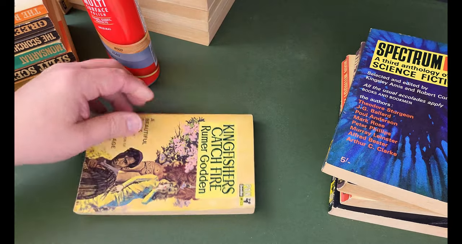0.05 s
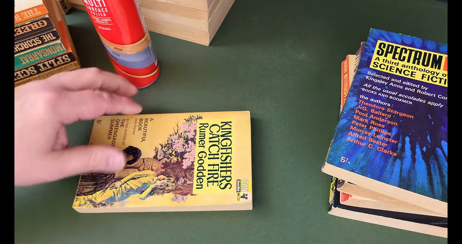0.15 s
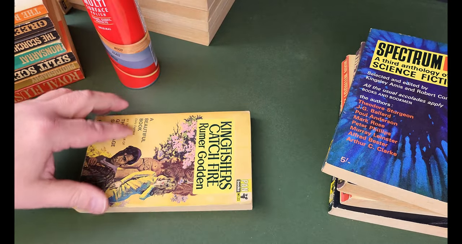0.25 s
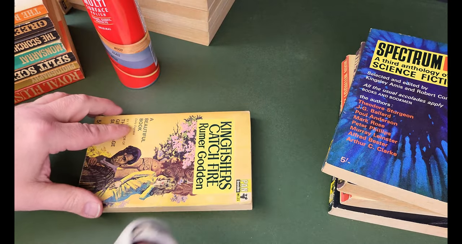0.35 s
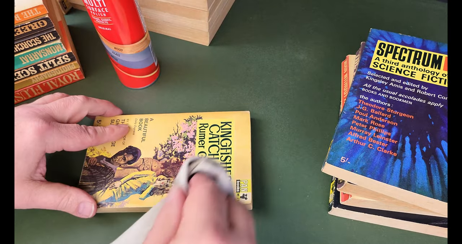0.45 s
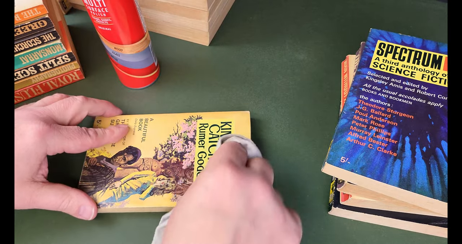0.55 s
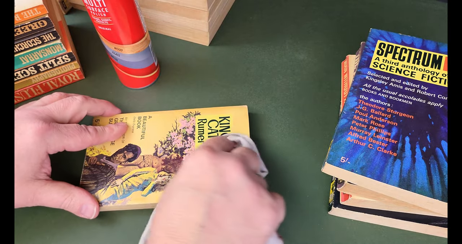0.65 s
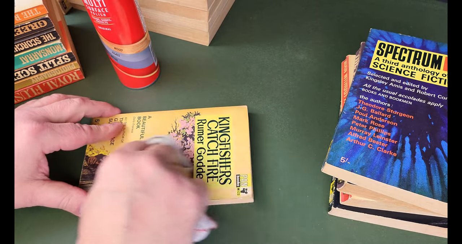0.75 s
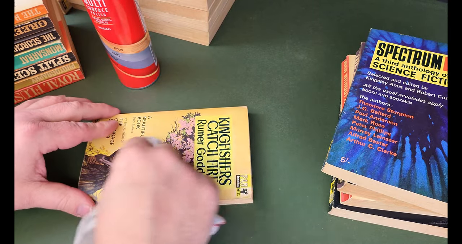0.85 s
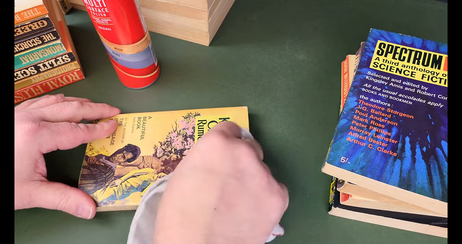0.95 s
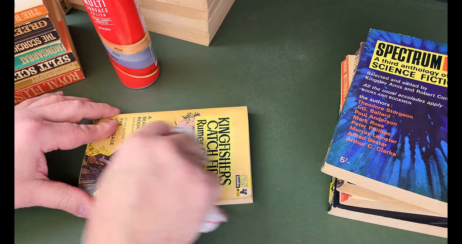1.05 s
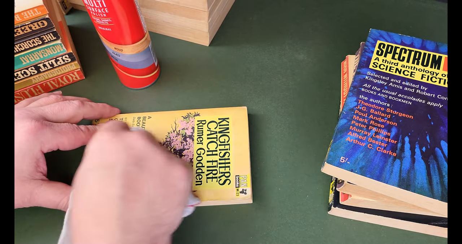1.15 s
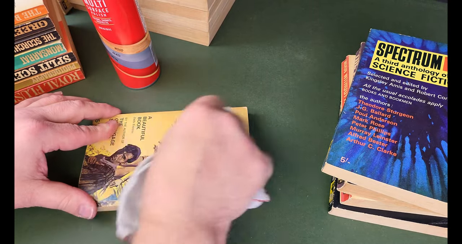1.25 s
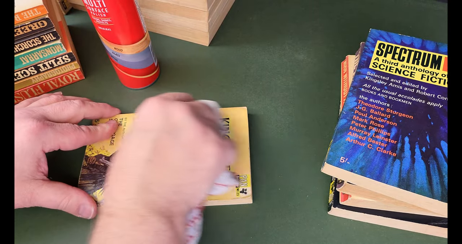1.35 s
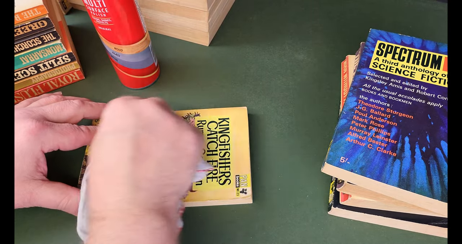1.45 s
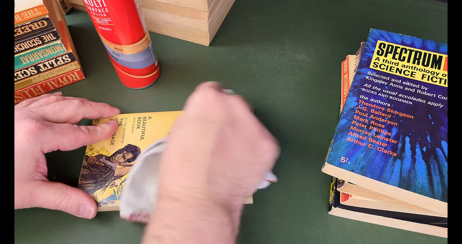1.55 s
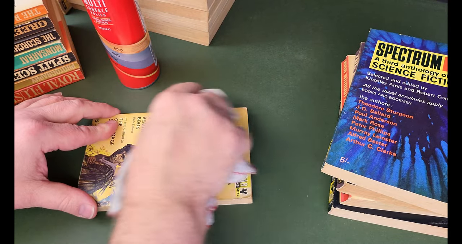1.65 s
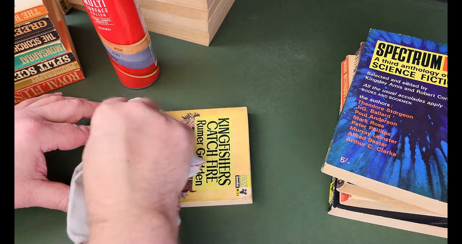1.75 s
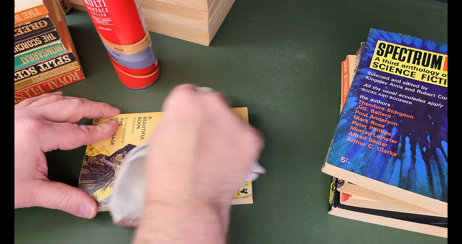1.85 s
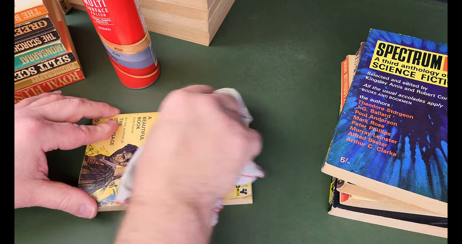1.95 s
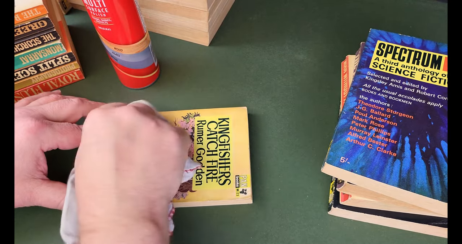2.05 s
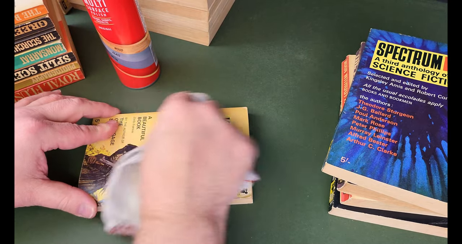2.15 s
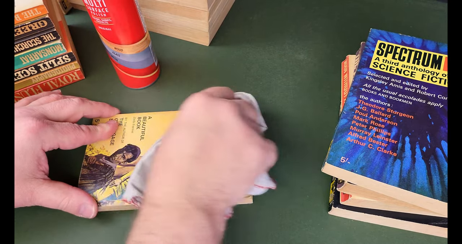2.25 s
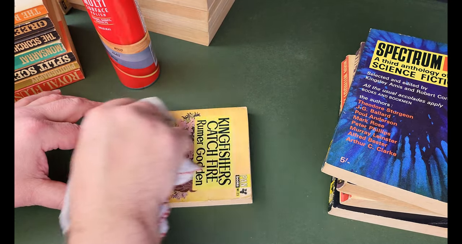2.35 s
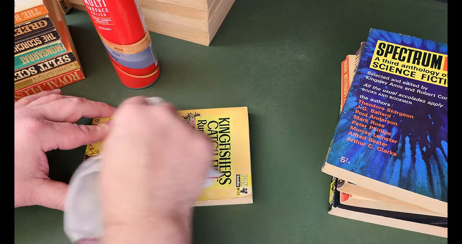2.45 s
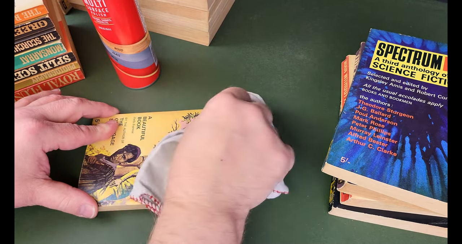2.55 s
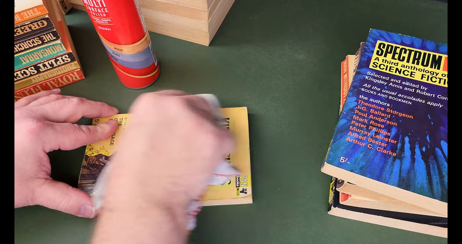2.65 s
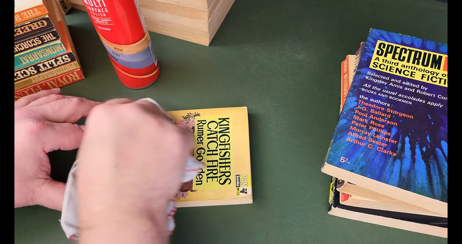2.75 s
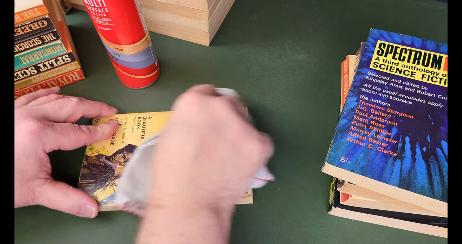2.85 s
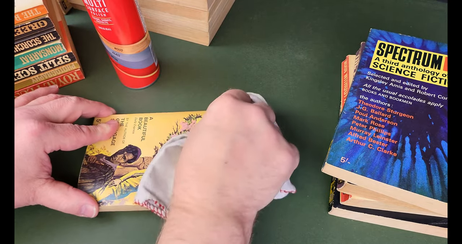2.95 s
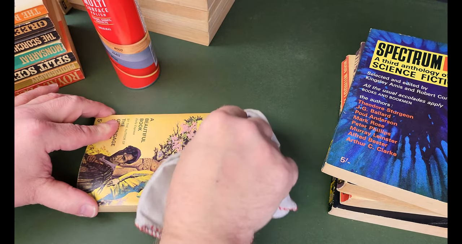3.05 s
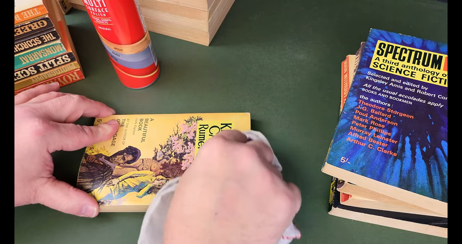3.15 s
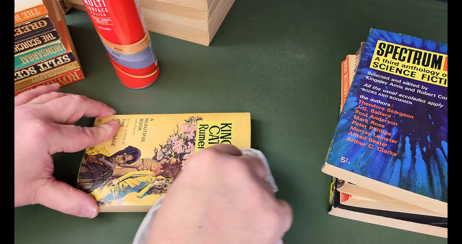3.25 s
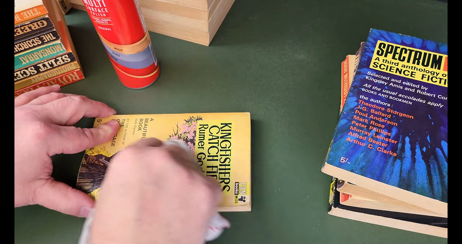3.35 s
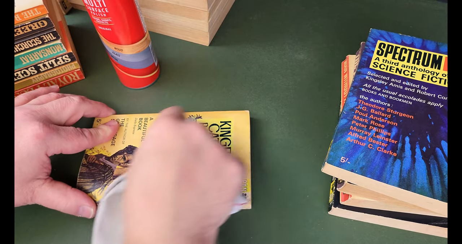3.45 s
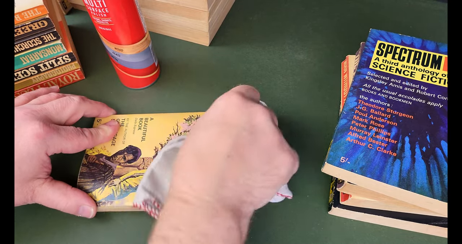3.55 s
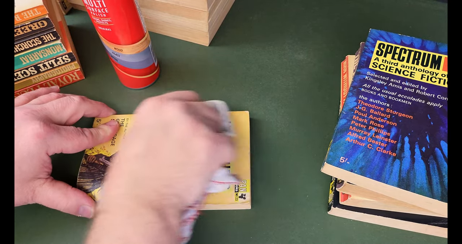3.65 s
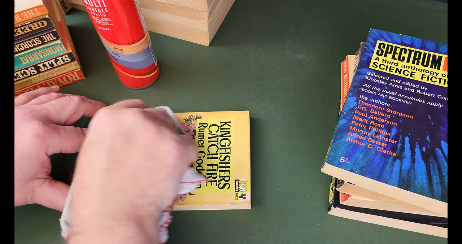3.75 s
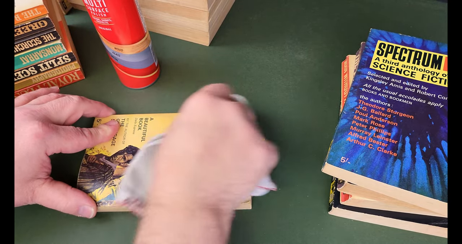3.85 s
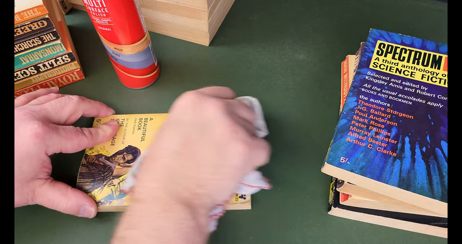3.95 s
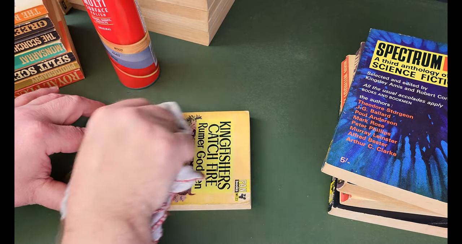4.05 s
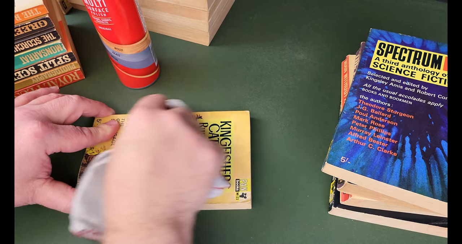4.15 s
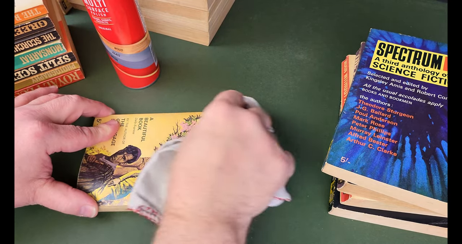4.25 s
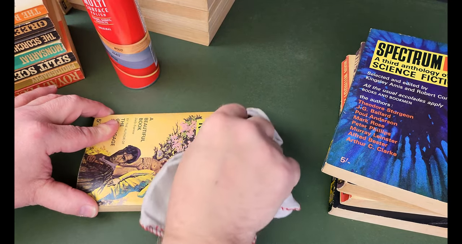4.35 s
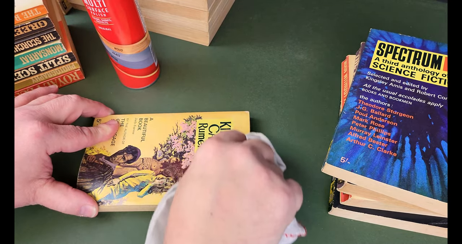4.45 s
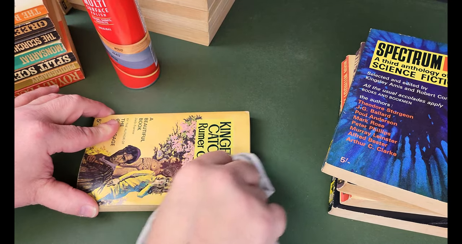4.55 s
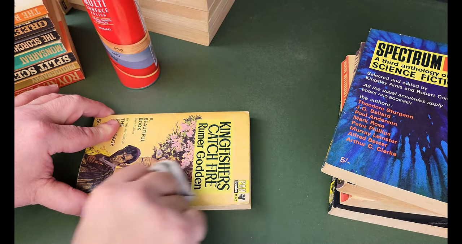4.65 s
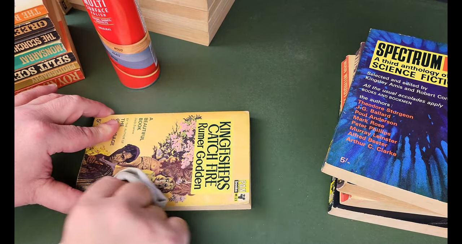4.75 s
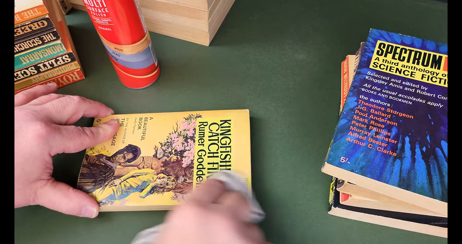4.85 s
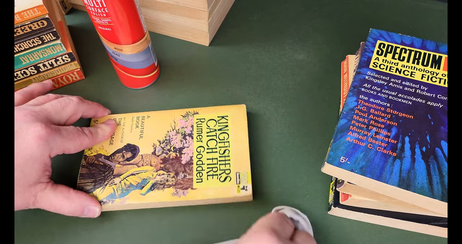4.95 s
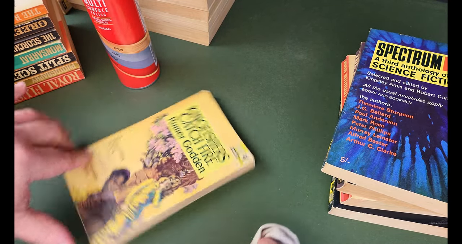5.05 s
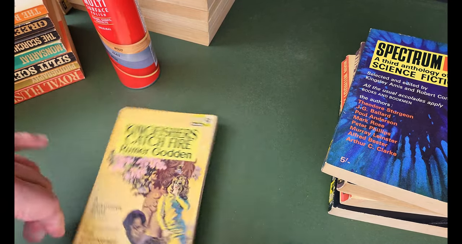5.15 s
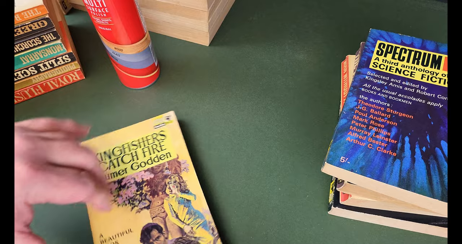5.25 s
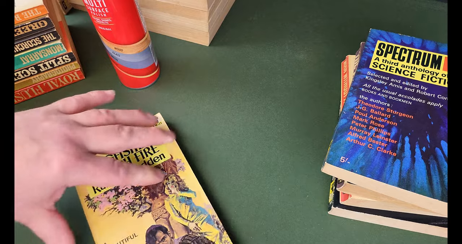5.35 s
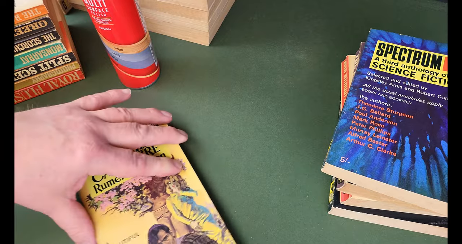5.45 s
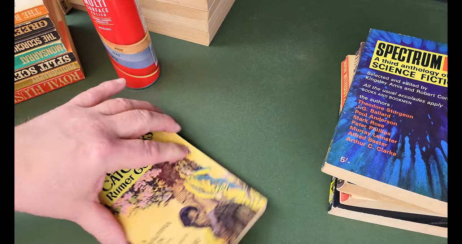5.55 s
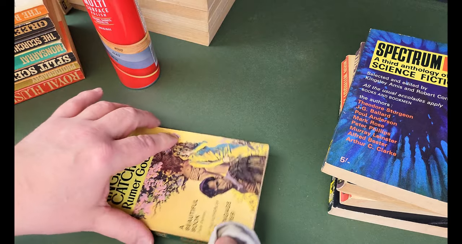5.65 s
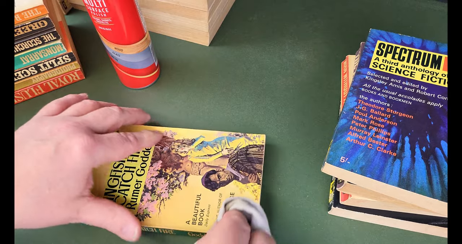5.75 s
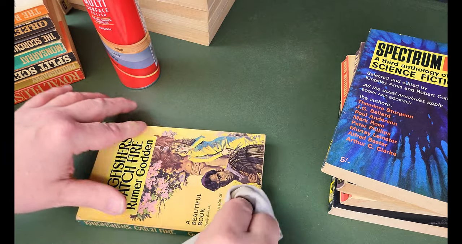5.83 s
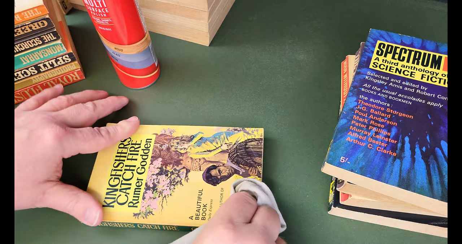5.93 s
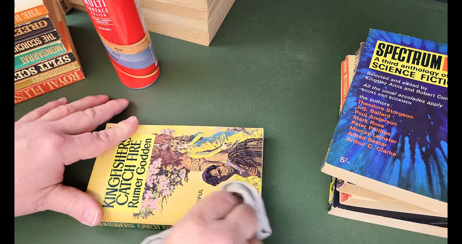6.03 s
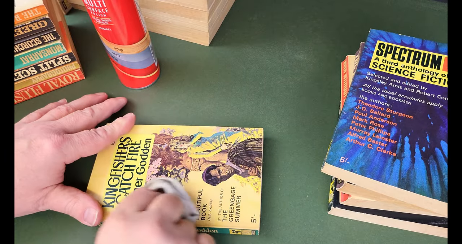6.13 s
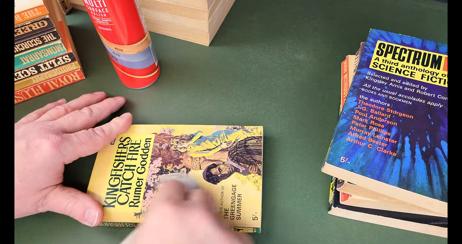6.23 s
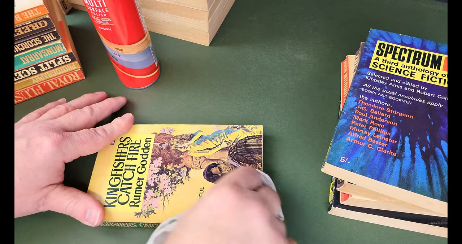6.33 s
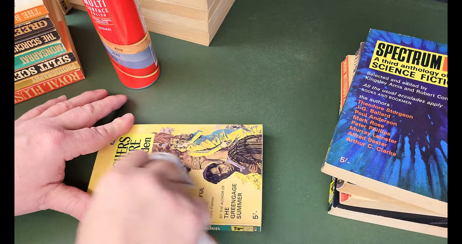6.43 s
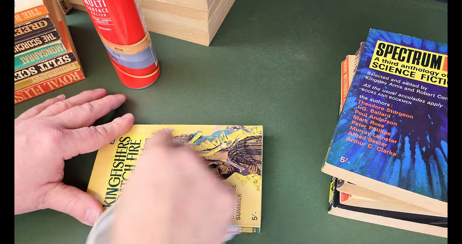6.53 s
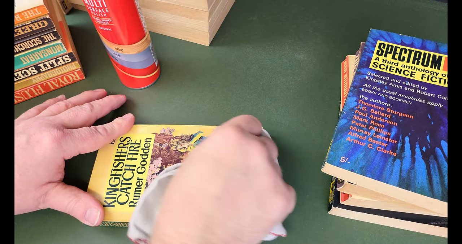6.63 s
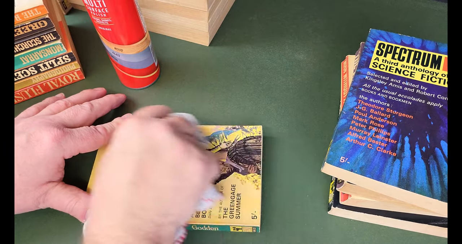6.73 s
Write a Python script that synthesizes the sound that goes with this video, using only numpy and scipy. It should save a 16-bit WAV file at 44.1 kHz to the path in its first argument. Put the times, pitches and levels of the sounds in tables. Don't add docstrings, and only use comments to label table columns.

```python
import sys
import numpy as np
from scipy import signal
from scipy.fft import rfft, irfft, next_fast_len
from scipy.io import wavfile
from scipy.ndimage import uniform_filter1d

SR = 44100
rng = np.random.default_rng(int(sys.argv[2]) if len(sys.argv) > 2 else 0)


def output_pcm(signal):
    pcm = np.clip(np.atleast_2d(signal).T, -1, 1) * 32767
    wavfile.write(sys.argv[1], SR, np.round(pcm).astype(np.int16))


def ratio(d):
    e = np.asarray(d, float) / 20
    return 10 ** e


N = 299439
T, M = np.arange(N) / SR, next_fast_len(N)
F = np.maximum(np.arange(M // 2 + 1) * SR / M, 1)
C = np.linspace(0, N / SR, N // (2 * 20))
SLAP_S = .1582


def unit(x):
    return x / np.sqrt(np.mean(x ** 2))


def shape(table, hz):
    table_hz, db = np.transpose(table)
    return np.interp(np.log(hz), np.log(table_hz), db)


def walk(rate):
    hold = int(1 / C[1] / rate)
    steps = np.repeat(rng.standard_normal(len(C) // hold + 1), hold)[:len(C)]
    return 1.2 * uniform_filter1d(uniform_filter1d(steps, hold), hold)


def ring(x, hz, t60):
    pole = np.exp(2j * np.pi * hz / SR - np.log(1000) / (t60 * SR))
    return signal.lfilter([0, pole.imag], [1, -2 * pole.real, abs(pole) ** 2], x)


def catches(rate, spread_db):
    size = ratio(spread_db * rng.standard_normal(M)) * np.sign(rng.standard_normal(M))
    return unit(size * (rng.random(M) < rate / SR))


def add(out, s, x):
    i = int(s * SR)
    out[i:i + len(x)] += x[:len(out) - i]


# f/Hz, density/dB per Hz
ROOM_COLOUR = [(18, -35), (30, -10), (85, -1), (243, -1), (443, -10.5), (673, -11), (945, -19.5),
               (3490, -24.5), (4090, -23), (7500, -27), (15500, -30)]


def room():
    level_db, duck_db, duck_back_s = -66.5, -5, .5
    duck = duck_db * (T > SLAP_S) * np.exp(-(abs(T - SLAP_S) / duck_back_s) ** 2)
    hiss = irfft(rfft(rng.standard_normal(M)) * ratio(shape(ROOM_COLOUR, F)), M)[:N]
    return ratio(level_db + duck) * unit(hiss)


# f/Hz, level/dB, t60/s
TABLE_MODES = [(66, -22, 0.28), (86, -4, 0.24), (128, -5, 0.32), (191, -4, 0.16), (237, 4, 0.13),
               (270.5, -1, 0.1417), (372, -1.5, 0.11), (410.7, 2, 0.077), (485, 1.5, 0.044),
               (522, -4.5, 0.031), (708, -10, 0.07), (930, -6, 0.02), (1120, -15, 0.03),
               (1403, -22.5, 0.074)]


def table_parts(push, scatter_db, damp):
    parts = np.zeros((3, len(push)))
    for hz, db, t60 in TABLE_MODES:
        gain = ratio(db + scatter_db * rng.standard_normal())
        swing = gain * ring(ring(push, hz, 6.7 / hz), hz, damp * t60)
        parts[int(hz > 170) + int(hz > 420)] += swing * hz
    return parts


# t/s, level/dB
PRESSURE = [(0.0, -59), (0.26, -60), (0.6, -73), (0.9, -67), (1.6, -65.5), (1.9, -59), (2.42, -63.5),
            (2.62, -54), (3.0, -60), (3.3, -67.5), (4.3, -63), (4.6, -66.5), (5.06, -56), (5.3, -63),
            (5.93, -84), (5.99, -64), (6.3, -51), (6.5, -61), (6.79, -66.5)]
# t/s, deep peak level/dB, spread/s
HAND_LEANS = [(.14, -50, 0.1), (.26, -47.5, 0.052), (0.72, -51.5, 0.052), (.91, -59.5, 0.068),
              (1.11, -56, 0.028), (1.24, -51, 0.053), (1.608, -53, 0.018), (1.899, -55, 0.17),
              (2.21, -54.5, 0.057), (2.33, -52, 0.025), (2.559, -49, 0.081), (2.72, -48, 0.069),
              (2.87, -49.5, 0.13), (3.02, -56, .05), (3.57, -54.5, 0.066), (3.88, -55.5, 0.067),
              (4.21, -50.5, 0.055), (4.41, -51.5, 0.062), (4.76, -64, 0.02), (5.01, -54, 0.027),
              (5.499, -61.5, 0.052), (5.985, -46, .018), (6.05, -57, 0.052), (6.23, -52, 0.05),
              (6.35, -45, 0.032), (6.43, -54, 0.034), (6.61, -53, 0.035)]


def rumble():
    rest_db, deep_rest_db, deep_slope, book_rest_db, book_slope = -65, -70, .3, -70, 0.68
    lean_rise_db, lean_fall_db = 14, 11
    press_db = np.interp(C, *np.transpose(PRESSURE))
    deep = ratio(2 * (deep_rest_db + deep_slope * (press_db - rest_db)))
    for s, db, spread_s in HAND_LEANS:
        u = (C - s) / spread_s
        deep = deep + ratio(2 * (db + np.minimum(lean_rise_db * u, -lean_fall_db * u)))
    lump = (deep / uniform_filter1d(deep, size=330)) ** 0.26
    board = lump * ratio(press_db)
    book = lump * ratio(book_rest_db + book_slope * (press_db - rest_db))
    out = np.zeros(N)
    for part, gain in zip(table_parts(catches(260, 2.6)[:N], 0, 0.67), (np.sqrt(deep), board, book)):
        loudness = uniform_filter1d(unit(part) ** 2 + .05, size=2400)
        out += unit(part / loudness ** 0.31) * np.interp(T, C, gain) * ratio(0.34)
    return out


# t/s, board peak level/dB, deep level/dB and book level/dB re board
HARD_TAPS = [(0.049, -43, -18, 6), (0.883, -48, -8, 1.5), (1.264, -39.5, -2, -9.5), (3.044, -38, -19, 0.5),
             (4.184, -62, -5, -20), (4.742, -31.5, -32, 1), (5.088, -44, -21, -21), (5.95, -45.5, -7, -3.5),
             (6.408, -37.5, -14.5, -26), (6.45, -51, -11, 1.5)]
# t/s, board peak level/dB, deep level/dB and book level/dB re board
PADDED_BUMPS = [(0.693, -45, -9.5, -8.5), (1.098, -57.5, 6, -13), (1.214, -39.5, -1, -15),
                (1.581, -63, -1, -15), (2.481, -48, -3.5, -17.5), (2.56, -45, -10, -3.5),
                (2.649, -41.5, -15, -9), (2.718, -54, 5.5, -14), (2.872, -46, 7, -13.5),
                (2.972, -38.5, -12, -2), (3.003, -42, -13, 5), (3.08, -44.5, -27, -1),
                (3.148, -48.5, -7, -1), (3.337, -48.5, -6, -12.5), (4.325, -51.5, -18, 2),
                (4.386, -46, -13, -5), (4.79, -48, -18, -7.5), (4.975, -43, -3, -11.5),
                (6.028, -49, -5, -16), (6.182, -37, -20, 2), (6.268, -39.5, -7, -5), (6.29, -33, -2, -5),
                (6.314, -42, 4, -5), (6.572, -46, -14, 0)]


def knocks():
    out, t = np.zeros(N), T[:SR // 5]
    for rows, contact_s in ((HARD_TAPS, 0.015), (PADDED_BUMPS, .028)):
        for s, db, deep_db, book_db in rows:
            u = t / contact_s
            push = rng.standard_normal(len(t)) * (u < 1) * np.exp(-1.2 * u)
            parts = table_parts(push, 1.2, 0.52)
            for part, relative_db in zip(parts, (deep_db - 4.5, 0, book_db)):
                add(out, s, part / abs(part).max() * ratio(db + relative_db))
    return out


# t/s, peak level/dB, f/Hz
PAPER_TICKS = [(0.351, -60, 2500), (.131, -48, 6000), (6.292, -42, 800), (5.1476, -27, 5330),
               (5.234, -25, 4200), (5.256, -23, 6850), (5.2867, -28, 5340), (5.4894, -55, 3170),
               (5.9516, -38, 2780), (6.271, -44, 1500), (6.285, -50, 1600)]


def ticks():
    out, t = np.zeros(N), T[:SR // 5]
    for s, db, hz in PAPER_TICKS:
        x = ring(rng.standard_normal(len(t)) * np.exp(-t / 0.0011), hz, 0.00241)
        add(out, s, ratio(db - 2.0) * x / abs(x).max())
    return out


# t/s, peak level/dB, f/Hz, swell/s
HAND_THUDS = [(0.05, -31.5, 506, 0.006), (3.002, -38, 410, 0.0036), (3.017, -41, 342, 0.0083),
              (3.046, -37.5, 381, 0.0048), (3.105, -51, 352, 0.013), (3.14, -47.5, 343, 0.01),
              (0.055, -41.5, 196, 0.01), (.09, -46.5, 96, .025), (4.743, -31, 237, 0.0079),
              (5.955, -34, 127.3, 0.014), (5.955, -37, 186, 0.009), (6.181, -38.5, 139.5, 0.02),
              (6.186, -39, 500, 0.009), (6.29, -34, 121, 0.019), (5.9, -45, 126, 0.014),
              (.1575, -24, 600, .0005), (6.3152, -25, 270, .0012), (6.3, -35, 190, .003),
              (6.193, -32, 397, 0.0017), (6.413, -40, 350, 0.0029), (3.083, -37, 350, .0015),
              (2.974, -41, 290, .003), (4.7695, -32.5, 240, 0.0028), (4.4, -47, 185, .004),
              (5.978, -38, 159, 0.0066), (2.57, -44.5, 400, 0.0069), (2.72, -45, 201, .006),
              (4.99, -44, 231, .012), (5.06, -48, 250, 0.013)]


def thuds():
    out, t = np.zeros(N), T[:SR // 3]
    for s, db, hz, swell_s in HAND_THUDS:
        swell = t / swell_s * np.exp(1 - t / swell_s)
        add(out, s, ratio(db) * np.sin(2 * np.pi * hz * t) * swell)
    return out


# t/s, peak level/dB, f/Hz, length/s
COVER_SCUFFS = [(0.049, -36.5, 680, 0.023), (0.139, -43, 580, 0.021), (4.313, -36.5, 1300, 0.025),
                (4.331, -45, 1400, 0.027), (.695, -54, 1000, .03), (1.77, -54, 676, 0.073),
                (2.6, -50, 750, 0.047), (2.93, -51, 950, 0.054), (2.997, -42.5, 900, 0.011),
                (3.04, -43.5, 940, 0.032), (3.14, -51, 795, .025), (5.16, -46.5, 480, 0.039),
                (4.387, -44, 650, 0.0073), (4.742, -41, 910, 0.03), (4.872, -51, 3230, 0.0094),
                (5.489, -47.5, 1130, 0.023), (5.951, -48, 720, .006), (6.03, -60, 950, .06),
                (6.29, -46, 800, .02), (3.11, -54, 780, .01), (3.56, -56, 650, .04)]


def scuffs():
    out, t = np.zeros(N), T[:SR // 3]
    for s, db, hz, length_s in COVER_SCUFFS:
        rub = rng.standard_normal(len(t)) * np.exp(-(t / length_s) ** 2)
        x = ring(ring(rub, hz, 2.5 / hz), hz, 2.5 / hz)
        add(out, s, ratio(db) * x / abs(x).max())
    return out


def scrapes(rows, width, peak_at):
    out, t = np.zeros(N), T[:SR // 5]
    for start, stop, db, from_hz, to_hz in rows:
        u = t / (stop - start)
        lowpass = signal.butter(2, width * from_hz / 2, fs=SR, output="sos")
        smooth = signal.sosfilt(lowpass, rng.standard_normal((2, len(t))))
        phase = 2 * np.pi * np.cumsum(np.interp(u, [0, 1], [from_hz, to_hz])) / SR
        band = smooth[0] * np.cos(phase) + smooth[1] * np.sin(phase)
        swell = np.sin(np.pi / 2 * np.interp(u, [0, peak_at, 1], [0, 1, 0]))
        add(out, start, ratio(db) * swell * unit(band))
    return out


# start t/s, stop t/s, level/dB, from f/Hz, to f/Hz
PAGE_SWISHES = [
    (0, .035, -62, 9000, 9500),
    (.035, .12, -56, 5500, 8790),
    (.04, .11, -67, 12000, 13000),
    (.125, .14, -62, 6000, 6000),
    (5.1, 5.17, -44, 7000, 7600),
    (5.17, 5.21, -46, 7600, 7600),
    (5.22, 5.3, -44, 7600, 7300),
]


def page_edges():
    return scrapes(PAGE_SWISHES, .45, .65)


# start t/s, stop t/s, level/dB, from f/Hz, to f/Hz
EDGE_SCRAPES = [(5.1, 5.18, -45, 2950, 2440), (5.21, 5.27, -52, 1250, 1270), (5.24, 5.34, -61, 760, 756),
                (5.3, 5.41, -61, 1550, 1600), (5.49, 5.56, -64, 1202, 1280), (5.5, 5.57, -59.5, 3200, 3200),
                (5.55, 5.67, -56, 1400, 1050), (5.57, 5.65, -55, 3100, 3490)]


def book_edges():
    return scrapes(EDGE_SCRAPES, 0.13, 0.37)


# start t/s, stop t/s, level/dB, from f/Hz, to f/Hz
CLOTH_FOLDS = [(1.12, 1.21, -52.5, 2000, 2315), (1.14, 1.205, -59.5, 1436, 1376),
               (1.26, 1.35, -56, 2650, 2490), (1.46, 1.53, -58, 2710, 3000), (1.77, 1.84, -59, 2900, 2950),
               (1.77, 1.83, -63, 1444, 1550), (2.09, 2.16, -54, 2800, 2515), (2.41, 2.485, -55, 2900, 2535),
               (2.74, 2.82, -57.5, 2790, 2620), (3.37, 3.48, -57.5, 1844, 2170),
               (3.73, 3.83, -54.5, 2243, 2600), (4.08, 4.18, -56, 2940, 2760),
               (4.23, 4.31, -55.5, 2550, 2700), (4.89, 4.98, -56, 3130, 3300), (4.9, 4.99, -60, 1400, 1540),
               (6.48, 6.565, -58, 1500, 1787), (2.2, 2.29, -58, 2500, 2750), (1.6, 1.67, -63, 2590, 2960),
               (3.91, 3.99, -64, 1500, 1656), (3.2, 3.33, -72, 2500, 2600), (3.33, 3.39, -59.5, 3890, 3600),
               (3.15, 3.32, -64, 3800, 3800), (4.5, 4.66, -62, 3800, 3500), (4.76, 4.82, -56, 3096, 3010)]


def taut_folds():
    return scrapes(CLOTH_FOLDS, 0.19, 0.86)


# f/Hz, level/dB, t60/s, first swing towards 1 or away -1
BLOW_MODES = [(110, -24, .4, -1), (121, -9.3, .055, 1), (176.6, -25, .33, -1), (197, -27.5, .4, -1),
              (234.1, -5.4, .126, -1), (277.8, -6, .078, -1), (348.9, 18.1, .0266, -1),
              (351.8, 20.7, .015, 1), (401.1, -9, .114, -1), (437.4, 1.7, .035, -1),
              (493.1, -4.1, .059, -1), (641, -22.8, .106, -1), (726, -1.6, .017, -1),
              (1678, 1.4, .0072, -1)]
# f/Hz, level/dB, t60/s
ROOM_TAIL = [(95, -30, .3), (137, -29, 0.27), (228, -31, 0.26), (360, -30, .19), (495, -29, 0.13),
             (710, -26, 0.11), (1007.4, -30.5, 0.12), (1400, -30, 0.094), (2200, -35, 0.085),
             (3370, -38, 0.045), (5120, -40.5, 0.03556), (8000, -54, .02), (12000, -55.5, .012)]


def slap():
    air_db, air_at_s, air_width_s = -1, .00175, .00027
    crack_db, blow_at_s, blow_s = -18, .001916, .00025
    out, t = np.zeros(N), T[:SR // 2]
    push = np.sin(np.pi * np.clip((t - blow_at_s) / blow_s, 0, 1)) ** 2
    push /= push.sum()
    x = ratio(air_db) * np.exp(-((t - air_at_s) / air_width_s) ** 2)
    for hz, db, t60, side in BLOW_MODES:
        x += side * ratio(db) * ring(push, hz, t60)
    crack = ring(rng.standard_normal(len(t)), 1400, 0.0042) / 5
    x += ratio(crack_db) * crack * np.exp(-((t - .003) / .0008) ** 2)
    for hz, db, t60 in ROOM_TAIL:
        noise = unit(ring(ring(rng.standard_normal(len(t)), hz, 4 / hz), hz, 4 / hz))
        x += ratio(db - 60 * t / t60) * noise * np.clip(t / 0.0014, 0, 1) ** 4
    add(out, SLAP_S, x)
    return out


BANDS = 500 * 2 ** (np.arange(41) / 8)
RANGE = (BANDS > 7500) + 2 * (BANDS < 1950)
BLEND = np.clip(np.log2(BANDS / 7500) / .7 + .5, 0, 1)
WEIGHT = np.array([(1 - BLEND) * (RANGE < 2), BLEND, RANGE == 2]).T


def spread(ranges):
    return np.exp(WEIGHT @ np.log(ranges + 1e-30))


def shares(colour):
    power = ratio(2 * shape(colour, BANDS)) * BANDS
    return (power / spread(np.bincount(RANGE, power)))[:, None]


def bump(centre_hz, octaves):
    return np.exp(-.5 * (np.log2(BANDS[:, None] / centre_hz) / octaves) ** 2)


def octaves_above(hz):
    return np.log2(np.maximum(BANDS, hz)[:, None] / hz)


# f/Hz, density/dB per Hz
SLOW_COLOUR = [(500, -24.5), (800, -3), (1080, -16.5), (1350, -0.5), (1800, -6.5), (2800, -6), (3600, -4.5),
               (5500, -5.5), (8000, -11.5), (11000, -24.5), (16000, -35.5)]


def slide(db, sheen_db, drag_db, colour):
    slow_db, brisk_db = -55, -51.5
    brisk = np.clip((db - slow_db) / (brisk_db - slow_db), 0, 1)
    ranges = np.array([db, db + sheen_db, db + drag_db])
    return (brisk * shares(colour) + (1 - brisk) * shares(SLOW_COLOUR)) * ratio(2 * WEIGHT @ ranges)


# t/s, level/dB
CARRIED_CLOTH = [(.2, -70.5), (.3, -86), (.38, -75), (.46, -69.5), (.53, -75), (.56, -86), (.6, -76),
                 (.68, -88)]


def rustle():
    whisper = (BANDS > 3600) & (BANDS < 6200)
    power = ratio(2 * np.interp(C, *np.transpose(CARRIED_CLOTH), -200, -200))
    return whisper[:, None] * power / whisper.sum()


# t/s, level/dB
BOOK_SET_DOWN = [(0.0, -48.5), (.034, -55), (0.056, -56), (0.082, -57), (.115, -62), (0.134, -65),
                 (0.15, -60), (.159, -62)]
BOOK_SPUN = [(5.0, -62), (5.052, -58), (5.098, -41), (5.148, -37.5), (5.17, -41.5), (5.19, -39),
             (5.213, -42.5), (5.241, -36.5), (5.272, -41), (5.287, -40), (5.305, -43), (5.368, -49.5),
             (5.478, -82.5)]
BOOK_TURNED = [(5.488, -67), (5.528, -47.5), (5.536, -53), (5.597, -44.5), (5.718, -51.5), (5.75, -52.5),
               (5.866, -83), (5.94, -90)]
# f/Hz, density/dB per Hz
SPIN_COLOUR = [(290, -39), (500, -9), (968, -10), (1200, -10.5), (1800, -11), (2610, -3.5), (3850, -3),
               (6930, -0.5), (11500, -10.5), (15500, -27)]
TURN_COLOUR = [(290, -38), (500, -8), (686, -10), (758, -14), (1170, -7), (1770, -9.5), (1960, -7.5),
               (2930, -2), (3850, -4), (8980, -7.5), (15500, -33.5)]
# sheen level/dB and drag level/dB at full speed, thinning/dB per octave and dB of slowing
SLIDE_TONES = [
    (-13, -15.5, .2),
    (-0.5, -14, 0.021),
    (-4, -8.5, 0.037),
]


def book_slides():
    sheen_slope, drag_slope, lag_s = 0.61, 0.1, 0.039
    top_loss = .8
    power = np.zeros((len(BANDS), len(C)))
    moves = (BOOK_SET_DOWN, BOOK_SPUN, BOOK_TURNED)
    colours = (SPIN_COLOUR, SPIN_COLOUR, TURN_COLOUR)
    for rows, (sheen_db, drag_db, thinning), colour in zip(moves, SLIDE_TONES, colours):
        s, db = np.transpose(rows)
        slower_db = np.interp(C - lag_s, s, db - db.max())
        tilt = np.log2(np.minimum(BANDS, 8000)[:, None] / 5000)
        thin = ratio(-2 * thinning * np.maximum(slower_db, -8) * tilt)
        thin *= ratio(2 * top_loss * np.interp(C, s, db - db.max()) * octaves_above(8000))
        sheen = sheen_db + sheen_slope * slower_db
        drag = drag_db + drag_slope * slower_db
        power += thin * slide(np.interp(C, s, db, -200, -200), sheen, drag, colour)
    return power


# f/Hz, density/dB per Hz
COVER_COLOUR = [(470, -18), (800, -11), (1000, -13.5), (1150, -7.5), (1520, -1), (1910, -11.5), (2100, -13),
                (2500, -10), (3300, -7.5), (4000, -9.5), (5000, -7.5), (5970, -6.5), (9900, -18),
                (11700, -24.5), (13500, -32.5), (15500, -46)]
# start t/s, stop t/s, level/dB, swell/dB, sheen level/dB
SLOW_DRAGS = [(0.711, 0.72, -58.5, 0, -18), (0.73, 0.763, -62, 13, -25), (3.025, 3.09, -57, -1, -17),
              (3.112, 3.342, -58, 0, -13.5), (4.233, 4.32, -52.5, 9.5, -11), (4.337, 4.633, -56, -0.5, -13),
              (4.649, 4.788, -48.5, 8.5, -10.5), (4.873, 4.89, -53, 0, -18), (5.964, 5.982, -52, 9, -8.5),
              (6.01, 6.095, -63, 2, -14), (6.757, 6.793, -54.5, 11.5, -8)]


def slow_drags():
    rise_db_s, fall_db_s, drag_db = 700, 432, -9.5
    shade_hz, shade_octaves, shade_db, climb_oct_s, full_s = 2350, .36, -9, .6, .22
    power = np.zeros((len(BANDS), len(C)))
    for start, stop, level_db, swell_db, sheen_db in SLOW_DRAGS:
        db = level_db + np.interp(C, [start, stop], [-swell_db / 2, swell_db / 2])
        db -= rise_db_s * np.clip(start - C, 0, 1) + fall_db_s * np.clip(C - stop, 0, 1)
        centre_hz = shade_hz * 2 ** (climb_oct_s * (np.clip(C, start, stop) - start))
        shade = bump(centre_hz, shade_octaves) * min((stop - start) / full_s, 1) ** 2
        power += slide(db, sheen_db, drag_db, COVER_COLOUR) * ratio(2 * shade_db * shade)
    return power


# start t/s, stop t/s, level/dB, swell from start to stop/dB, sheen of speed/dB
BRISK_STROKES = [(0.792, 0.875, -50, 2.5, -8), (0.963, 1.04, -59.5, 2, -7.5), (1.126, 1.202, -50.5, 3, -4),
                 (1.286, 1.363, -54, 2, -5), (1.446, 1.513, -50.5, 0, -1.5),
                 (1.61, 1.668, -52.5, -2.5, -7.5), (1.744, 1.824, -49, 5.5, -3.5),
                 (1.908, 1.987, -53, 1.5, -8), (2.062, 2.15, -51.5, -2, -3), (2.218, 2.3, -52.5, 1, -6.5),
                 (2.373, 2.471, -51, 3, -2.5), (2.549, 2.641, -50, 1, -5.5), (2.722, 2.81, -51, -1, -0.5),
                 (2.9, 3, -51, -2.5, -6), (3.376, 3.466, -52, 1, -6), (3.514, 3.636, -55, 2, -6.5),
                 (3.735, 3.819, -51, -4.5, -3), (3.91, 3.981, -51.5, -1.5, -6.5),
                 (4.062, 4.169, -52, 0, -3), (4.888, 4.981, -51, 4, -8.5), (6.118, 6.238, -49, 7, -9.5),
                 (6.319, 6.402, -55.5, -1.5, -12), (6.476, 6.555, -48.5, 2.5, -8),
                 (6.617, 6.708, -53.5, -0.5, -7.5)]
# t/s, f/Hz
HAND_HOLLOW = [(.77, 2230), (.97, 2500), (1.13, 2200), (1.3, 2690), (1.9, 2870), (2.2, 2680), (2.9, 2830),
               (3.37, 1905), (3.51, 2240), (3.73, 2530), (3.91, 3080), (4.06, 2700), (4.9, 3550),
               (6.32, 3600), (6.48, 1820), (6.62, 2600)]


def brisk_strokes():
    rise_s, stop_s, creep_db, creep_s = 0.03, 0.013, -13.5, 0.053
    heavy_drag_db, skim_knee_db, skim_slope = -6.5, -11, 1
    rasp_start_db, rasp_stop_db, rasp_octaves = 4, 4.5, .17
    dulling = 0.37
    power = np.zeros((len(BANDS), len(C)))
    for start, stop, level_db, swell_db, sheen_db in BRISK_STROKES:
        drag_db = heavy_drag_db - skim_slope * max(sheen_db - skim_knee_db, 0)
        before, after = np.clip(start - C, 0, 1), np.clip(C - stop, 0, 1)
        db = level_db + np.interp(C, [start, stop], [-swell_db / 2, swell_db / 2])
        slack_db = -12 * ((before / rise_s) ** 1.1 + (after / stop_s) ** 1.07)
        fast = ratio(2 * (db + slack_db))
        creep = ratio(2 * (db + creep_db - 10 * ((before + after) / creep_s) ** 2))
        mid = 1 - .5 * np.clip(2 * (C - start) / (stop - start) - 1.0, -1.3, 1.3) ** 2
        sheen = ratio(2 * sheen_db) * (0.89 * mid * fast + .5 * creep)
        drag = ratio(2 * drag_db) * (fast + 3 * creep)
        hollow_hz = np.interp(start, *np.transpose(HAND_HOLLOW))
        rasp_hz = hollow_hz * 2 ** np.interp(C, [start, stop], [-.05, .03])
        bunch_db = np.interp(C, [start, stop], [rasp_start_db, rasp_stop_db])
        bunch_db = bunch_db * np.maximum(2600 / rasp_hz, 1)
        tone_db = bump(rasp_hz, rasp_octaves) * bunch_db - 1.26 + dulling * sheen_db * octaves_above(9000)
        power += shares(COVER_COLOUR) * spread(np.array([fast + creep, sheen, drag])) * ratio(2 * tone_db)
    return power


def cloth():
    motion = brisk_strokes() + slow_drags() + book_slides() + rustle()
    motion = abs(uniform_filter1d(motion, size=3, axis=1))
    fibres = rfft(rng.standard_normal(M) + catches(6000, 4.2))
    shake_db, octave = 0.91 * walk(50), np.log2(F)
    out = np.zeros(N)
    for hz, power in zip(BANDS, motion):
        window = np.sqrt(np.clip(1 - abs(8 * (octave - np.log2(hz))), 0, 1))
        band = unit(irfft(fibres * window, M)[:N])
        waver_db = 1.6 * walk(8) + 1.9 * walk(30) + shake_db - 2.5
        out += band * np.interp(T, C, np.sqrt(power) * ratio(waver_db))
    return out


def scene():
    table = rumble() + knocks() + ticks() + thuds() + scuffs()
    friction = page_edges() + book_edges() + taut_folds() + cloth()
    return (room() + table + slap() + friction)[None]


def band_limit(x):
    return signal.sosfilt(signal.butter(12, 15690, fs=SR, output="sos"), x)


def record(dry):
    thin = signal.sosfilt(signal.butter(2, 55, "high", fs=SR, output="sos"), dry)
    return band_limit(np.clip(thin, -1, 1))


dry = scene()
out = record(dry)
output_pcm(out)
```